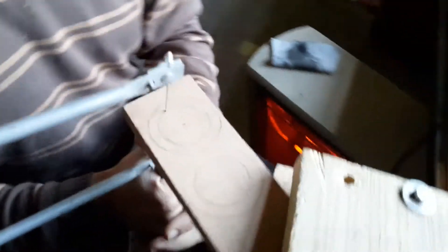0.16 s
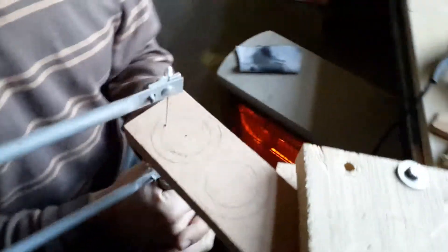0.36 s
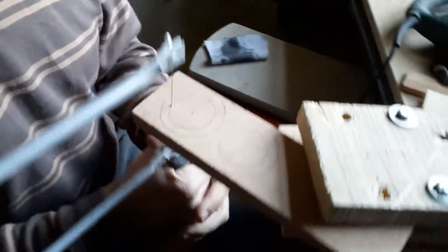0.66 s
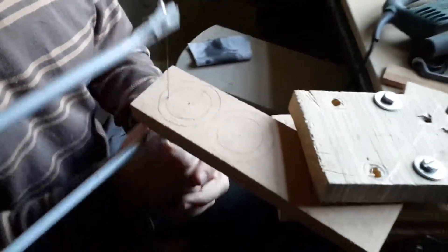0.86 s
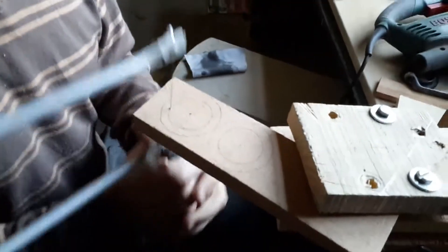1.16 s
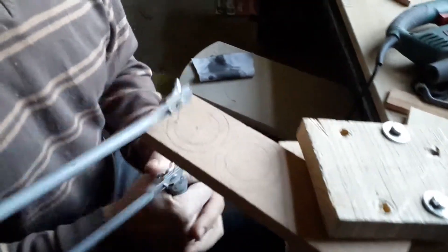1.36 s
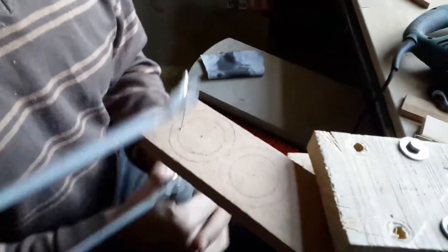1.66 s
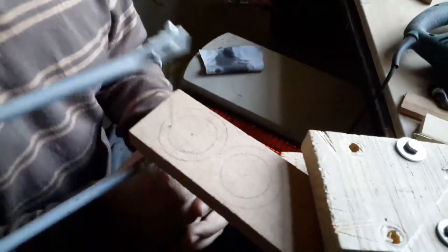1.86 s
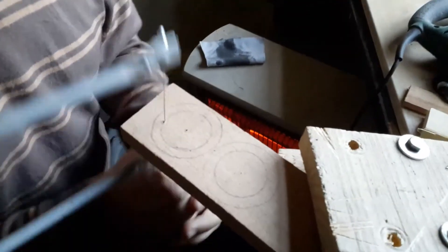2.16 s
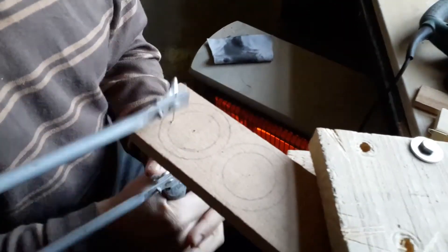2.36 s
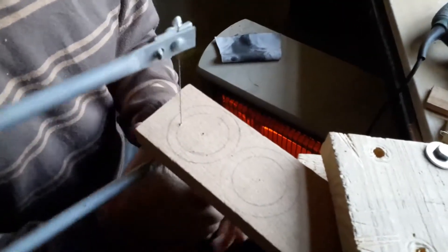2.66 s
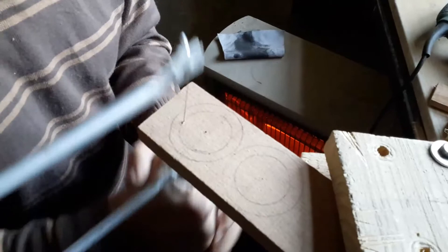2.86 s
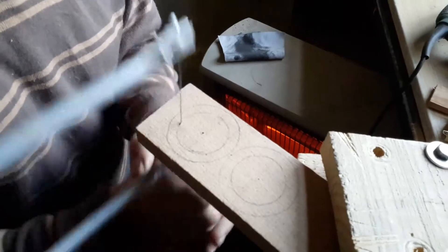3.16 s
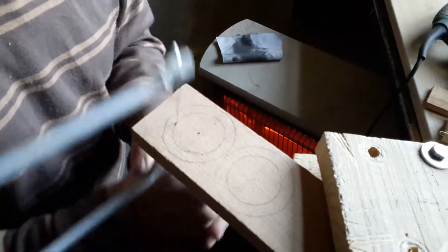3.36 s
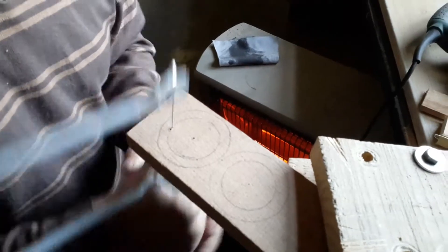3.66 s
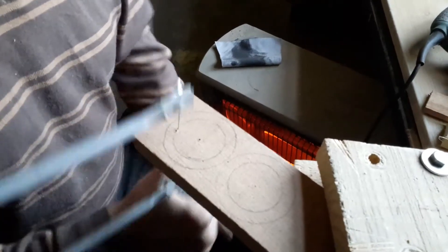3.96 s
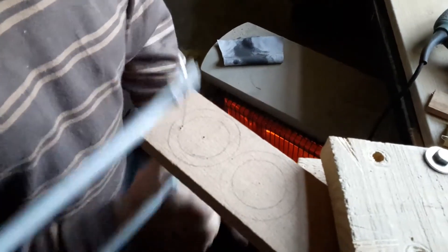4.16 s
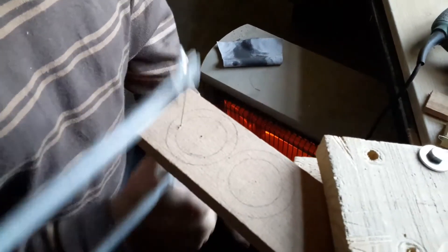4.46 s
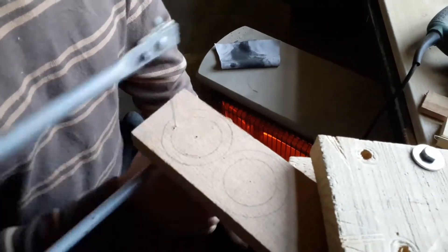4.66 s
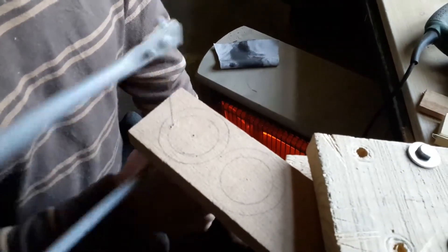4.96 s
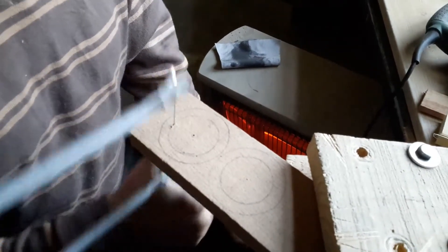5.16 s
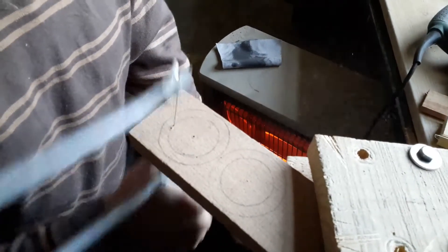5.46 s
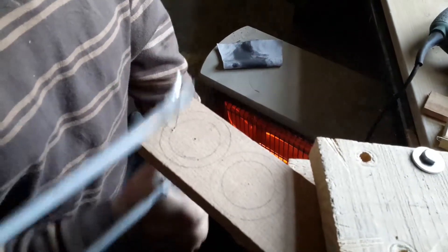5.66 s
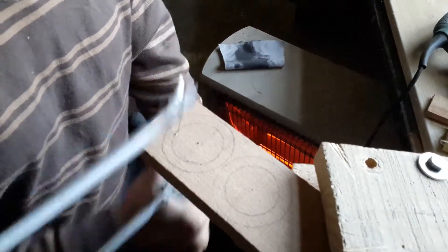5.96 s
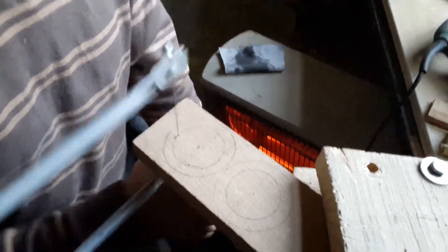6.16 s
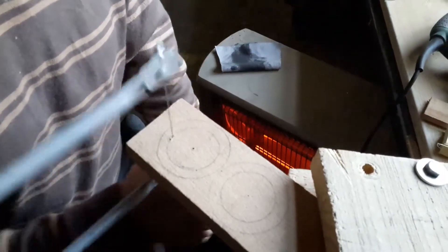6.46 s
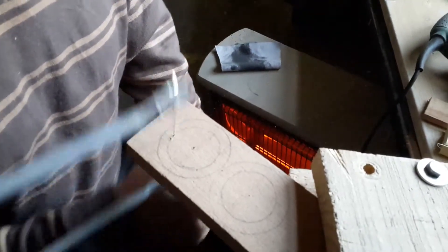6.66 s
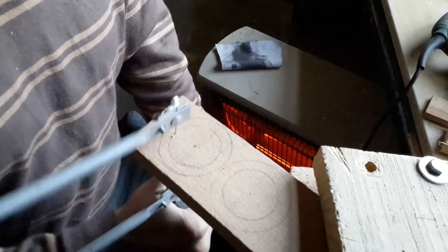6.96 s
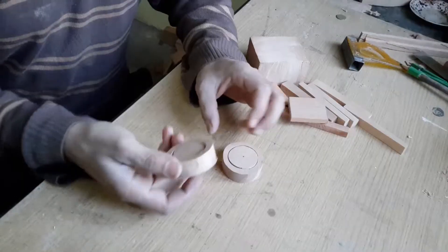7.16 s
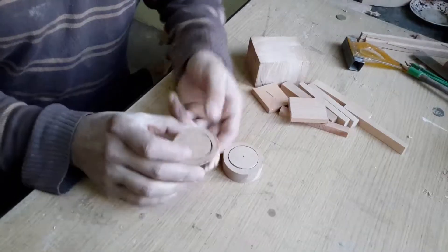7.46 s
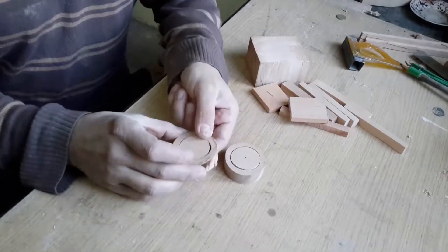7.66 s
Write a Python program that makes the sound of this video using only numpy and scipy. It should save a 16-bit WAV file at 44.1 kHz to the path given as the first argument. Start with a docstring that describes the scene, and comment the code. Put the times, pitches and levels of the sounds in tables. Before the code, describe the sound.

A wooden board thuds softly on a workbench, and two slow scrapes ease a hand fretsaw into it. Quick rasping strokes follow, about three back and forth each second, with brief squeaks from the thin blade. Several times the saw jams, knocking the board and rattling its steel frame. The sawing stops abruptly, leaving faint handling of wood. It is heard close up in a small, quiet workshop.

```python
"""Fingers tap wood, a board thuds on a workbench, and slow scrapes ease a hand fretsaw into it. Strokes follow,
about three each way a second: tooth clicks and tearing-fibre noise drive the filters of bench, board and blade.
Short tones sing, snagged teeth burst free, and now and then the jammed saw knocks the board: impulses excite
its decaying modes, and the steel frame rattles. The sound stops abruptly; then quiet handling of wood fades in."""
import sys
import numpy as np
from scipy import signal
from scipy.fft import irfft
from scipy.io import wavfile
from scipy.ndimage import uniform_filter1d

SR = 44100
rng = np.random.default_rng(int(sys.argv[2]) if len(sys.argv) > 2 else 0)


def put_to_file(sound):
    """Save the sound as 16-bit audio at rate SR, in the file named by the first command-line argument."""
    columns = np.atleast_2d(sound).T  # one column per channel
    safe = np.clip(columns, -1, 1)
    whole_steps = np.round(safe * 32767)
    wavfile.write(sys.argv[1], SR, whole_steps.astype(np.int16))


N = 343891

# Levels in the tables are relative: later gains shift them. Spectra have columns hz, level_db_per_hz;
# resonances have columns centre_hz, width_hz, lift_db.

# Down-and-up strokes of the saw: catch_s, length_s, tooth_rate_hz (at full hand speed),
# cut_pressure_db, return_pressure_db, fastest_return_moment (share of the length)
STROKES = [(0.932, 0.35, 574.4, 3, -5, 0.63), (1.245, 0.34, 600, 0.5, -7, 0.65),
           (1.598, 0.3, 604.8, -0.5, -9, .66), (1.916, 0.35, 637, 0.5, -5, .6),
           (2.261, 0.33, 578.8, 0.5, -5, 0.64), (2.583, 0.37, 627.4, 2, -4.5, 0.62),
           (3.155, .35, 489.6, -0.5, -6.5, .63), (3.49, 0.32, 609.6, 2, -4.5, 0.66),
           (3.819, 0.29, 620, 2, -19.5, .62), (4.143, 0.3, 554.2, 1, -2.5, .62),
           (4.444, 0.3, 582, 0.5, -6, 0.66), (4.754, 0.25, 608.6, -0.5, -3.5, 0.63),
           (5.047, 0.275, 678.5, 1.5, -6, .58), (5.342, 0.27, 572.8, 0, -2.5, .66),
           (5.633, 0.26, 570.3, 0.5, -7, 0.68), (5.924, 0.3, 668.5, 1.5, -3.5, .62),
           (6.216, 0.31, 620, 1, -5, 0.67), (6.513, 0.3, 630.5, 0.5, -3.5, 0.61),
           (6.821, 0.29, 643, 0.5, -2.5, 0.61)]
# Swing of the cut: start, fastest moment, end (shares of the stroke length, from the catch)
CUT_SWING = (-.09, .18, .43)
# Swing of the return: start, end (same shares)
RETURN_SWING = (.41, .87)
# The hand gathers pace: time_s, top_speed (share of full speed)
WARM_UP = [(.5, 0.4), (.85, 0.4), (1.0, .65), (1.7, 0.98)]
# Slow, even scrapes that ease the blade into the cut: start_s, end_s, pressure_db
SCRAPES = [(0.49, .58, -8), (.742, .945, -3.5)]
SCRAPE_ATTACK_S, SCRAPE_RELEASE_S = .006, .055
SCRAPE_HZ = 620  # tooth rate of the scrapes, were the hand at full speed
SLACK_DB = -5  # before the teeth catch, the blade only bows
COAST_S = 0.037  # the bench settles slowly when the blade stops

# Bench rumble while the saw runs: time_s, level_db
BENCH_RUMBLE = [(.5, -35), (1.0, -32.5), (1.75, -37.5), (2.05, -32.5), (2.4, -34.5), (2.7, -31.5),
                (3.9, -36), (4.25, -32.5), (4.7, -36.5), (5.4, -35), (5.68, -28.5), (5.9, -36.5),
                (6.5, -27), (6.72, -33), (7.05, -36)]
# Broad colour of each part under the teeth: hz, level_db_per_hz
BENCH_SPECTRUM = [(25, -44), (45, -25), (66, -6), (112, -16), (150, -9), (250, -6), (380, -9.5), (520, -8),
                  (900, -35.5), (3000, -95)]
BOARD_SPECTRUM = [(100, -31), (300, -7), (450, 1), (600, -0.5), (700, -2.5), (1000, -7), (1250, -1),
                  (1550, 0), (1900, -7.5), (2500, -14.5), (3300, -15.5), (5000, -43.5), (9000, -84)]
BLADE_SPECTRUM = [(400, -51.5), (1300, -24), (1600, -18.5), (1670, -4), (1850, -2), (1990, 3), (2110, -17),
                  (2380, -8.5), (2800, -27), (6000, -82.5)]
RASP_SPECTRUM = [(1200, -36), (2400, -2), (2900, -1.5), (3500, -4), (4300, -5.5), (4600, -21), (5700, -37),
                 (6400, -16.5), (7100, -45.5), (7600, -27), (8000, -46.5), (8700, -45), (9300, -79)]
# Resonances of the same parts: centre_hz, width_hz, lift_db
BENCH_RESONANCES = [(84.8, 10, 14.5), (141, 23, 10), (206, 15, 8), (228.2, 3.9, 8.5), (293.1, 9.7, 10),
                    (350.4, 21, 11), (371, 4.6, 1)]
BOARD_RESONANCES = [(467.8, 14, 16.2), (585.6, 7.1, 8), (760, 14, 10), (900, 14, 12), (1154, 84, 9.9),
                    (1270, 17, 0.91)]
BLADE_RESONANCES = [(1844, 14, 8), (1970, 22, 7.9), (1910, 36, 1.3)]
RASP_RESONANCES = [(3963, 92, 13.3), (5235, 170, 9.6), (6175, 63, 19.2), (7380, 220, 15.5)]

# A tooth snags and breaks free: start_s, level_db
SNAGS = [(1.605, -33), (1.831, -33), (3.146, -33.5), (3.557, -32), (4.451, -38), (5.208, -32.5),
         (5.354, -28.5), (6.227, -38), (6.832, -35)]
# Teeth in step with the board (low) or blade (high), which sings:
# middle_s, length_s, pitch_hz, slide_octaves_per_s, level_db
CHATTER = [(0.515, 0.065, 1970, -3, -51.5), (0.79, .09, 1920, -1.5, -41), (1.027, .12, 340.7, -0.4, -29.5),
           (1.32, 0.06, 469.2, -0.5, -27), (2.011, 0.083, 538.3, -10, -23.5),
           (2.064, .07, 305.5, -10.5, -26.5), (2.34, 0.056, 1846, 1, -26.5),
           (2.656, 0.063, 1862, -0.5, -22.5), (2.679, .06, 584.5, -5, -25), (3.226, .11, 1925, -0.5, -25),
           (3.374, .07, 581.5, 2, -31), (3.379, .05, 1169, -2, -34), (3.563, 0.027, 1811, -3, -23),
           (3.571, .08, 603, -1.5, -33), (3.725, .09, 504, -3, -29.5), (3.857, 0.043, 1850, 0, -26.5),
           (4.351, .09, 565.6, 0.2, -30), (4.501, .09, 292.3, 0, -24.5), (4.646, 0.075, 1942, 1.5, -30),
           (4.806, .05, 612.2, 2, -32), (4.81, 0.074, 1204, 1, -28), (4.822, 0.057, 1840, -2, -31),
           (4.935, 0.047, 2049, 1.5, -31), (5.108, 0.052, 1440, -3, -27), (5.396, .06, 590.1, 3, -31),
           (5.411, 0.078, 1103, 1.5, -33.5), (5.538, .05, 1975, 0.5, -32.5),
           (5.716, .05, 471.9, -3.5, -26.5), (5.826, .04, 1950, -0.5, -23.5), (5.986, .08, 1976, 0, -29.5),
           (6.721, .07, 1924, -0.5, -30), (6.885, .06, 1875, 2.5, -32), (6.895, .06, 591, -3, -21.5)]
CHATTER_TOP_HZ = 2520
# Splinters torn from the surface: hz, level_db_per_hz
SPLINTER_SPECTRUM = [(1200, -10), (2900, 5.5), (3700, -6), (5400, -8.5), (7000, -27), (9000, -28),
                     (13000, -42)]
SPLINTER_START_S, SPLINTER_END_S, SPLINTER_DB = 0.915, 1.12, -52.5  # the first hard stroke

# The jammed blade lifts the board and lets it slap back:
# start_s, level_db, frame_snap_db, favoured_mode_hz, mode_lift_db
KNOCKS = [(2.532, -15.5, -28, 445, 5.5), (3.4166, -11.5, -23, 1811, 0), (4.0473, -3, 0.5, 820.6, 5),
          (4.977, -17, -28, 560, 6), (5.575, -13, -29, 583.2, 5), (5.8613, -11, -20, 1157, -0.5)]
SOFT_KNOCK_HZ, HARDER_HZ = 1710, 5000  # top of a blow's spectrum: the faintest, and what full energy adds
REBOUND_HZ = 1486  # highest top of the spectrum of the rebounds
CONTACT_DB, CONTACT_S, CONTACT_GROWTH = -28, 0.00074, 1.7  # first contact grows faster than the slap
# The board shifts against the bench with a dull thud: start_s, level_db
THUDS = [(0.1588, -19.5), (.166, -11.5), (.194, -18.5), (.213, -32), (.576, -26.5), (1.211, -19),
         (2.2, -22), (4.46, -19.5), (6.53, -20)]
THUD_HZ = 560  # top of a thud's spectrum
SCUFF_DB, SCUFF_S = -18, 0.015  # a thud's faint scuff and its decay
PUSH_HZ, PUSH_S, PUSH_DB = 198.7, 0.0083, 2  # the low push of a thud
# Modes of the struck board: mode_hz, level_db
BOARD_MODES = [(136, -6.5), (182, -5), (233, -7.5), (345, -7), (390, -6.5), (440, -7.5), (532, -7.5),
               (586, -1), (702, -8.5), (822, -4.5), (1104, -3), (1157, -5.5), (1250, -8), (1495, -13.5),
               (1665, -6.5), (1809, -1), (1976, -7), (2153, -13), (2403, -14), (2638, -14.5), (3020, -16.5)]
FAVOUR_OCTAVES = 0.16  # reach of the lift around the favoured mode
# Crack of a blow: hz, level_db_per_hz
CRACK_SPECTRUM = [(60, -14.5), (150, -4), (500, 7.5), (800, 3), (1200, -3.5), (1450, -4), (1850, 8),
                  (2150, -1), (2500, 3), (3100, -10), (3600, -18.5), (4400, -13), (5400, -38), (9000, -54),
                  (14000, -61.5)]
# Snap of a blow: hz, level_db_per_hz
SNAP_SPECTRUM = [(1100 / 3, -24), (1100, 0), (2200, -1), (3100, -8),
                 (4300, -6), (5400, -32), (9000, -50), (14000, -54)]
# Returns of a blow from the board's edges and clamps: delay_s, amplitude_share
EDGE_ECHOES = [(0, 1), (.0011, -0.23), (.0022, 0.96), (.0056, 0.38), (.0078, -0.041), (0.0091, 0.2)]
# Boom of bench and room after a knock: delay_s (to the middle), length_s, pitch_hz, level_db
BOOM_SWELLS = [(0.038, 0.0441, 205, -14.5), (.068, 0.0468, 180, -15)]
KNOCK_ROOM_DB = 11.5
# Steel frame and clamps: hz, level_db_per_hz
FRAME_SPECTRUM = [(1000, -32.5), (2500, -10), (3400, -3.5), (4300, -1.5), (4800, -9), (5400, -28.5),
                  (9000, -48)]
# Their resonances: centre_hz, width_hz, lift_db
FRAME_RESONANCES = [(3350, 59, 12.5), (3580, 46, 8.5), (3980, 50, 9.5), (4270, 35, 5.5)]

# Quiet background of the workshop: hz, level_db_per_hz
AIR_SPECTRUM = [(25, -33.5), (45, -17.5), (80, 1), (250, 0), (550, -7.5), (1300, -13), (2300, -17.5),
                (3500, -31), (5300, -29.5), (7000, -41), (9000, -49.5), (14000, -56)]
# Its course: time_s, level_db
AIR_LEVEL = [(0, -43), (.12, -50), (.4, -51.5), (0.699, -49.5), (3.051, -53.5), (7.1, -49), (7.48, -90),
             (7.551, -62), (7.619, -63), (7.699, -56), (7.8, -52.5)]
# Light clicks of wood and metal under the fingers: start_s, level_db
TOUCHES = [(.088, -37), (0.125, -39.5), (.281, -42), (0.543, -31), (0.576, -27.5), (7.549, -60),
           (7.588, -64.5), (7.629, -58), (7.665, -59), (7.744, -51), (7.788, -56)]
# Colour of the clicks and of the rustle: hz, level_db_per_hz
TOUCH_SPECTRUM = [(100, 5), (400, 7.5), (1200, 4.5), (2000, -9.5), (3300, -12), (5000, -32), (7000, -45.5),
                  (12000, -57.5)]
# Reverberation of the room: hz, t60_s
ROOM_T60 = [(100, 0.7), (400, 0.43), (1000, 0.3), (2700, 0.2), (8000, 0.17)]
SILENT_FROM_S, SILENT_TO_S = 7.07, 7.48
LOW_CUT_HZ, EDGE_HZ = 72, 14470  # the microphone's bass roll-off, and the upper band limit


def saw(grip_db=1.8, clamp_s=0.00034, travel_s=0.0013, clamp_share=0.1, lean_db=1.15):
    """Forced vibration: bites and tearing drive each part; brighter parts depend more steeply on blade speed."""
    speed, height, hold, tooth_hz, pressure_db = arm_motion()
    bites, tearing = teeth(tooth_hz), fibres()
    grip = hold * amp(grip_db * wander(70))  # hard and soft spots in the wood
    t = np.arange(N) / SR
    moving = 1. * (speed > 0)
    last_moving_s = np.maximum.accumulate(t * moving)
    settling = np.exp(-(t - last_moving_s) / COAST_S) * (t > SCRAPES[0][0])

    def part(response, level_db, press, steepness, buzz, drag_db, dragging=moving):
        """Source and filter: buzz is the bites' share of the power, press the response to pressure in dB per dB."""
        drive = np.sqrt(buzz) * bites + np.sqrt(1 - buzz) * tearing
        # each bite returns from the blade clamp, whose distance changes: the colour sweeps
        reflection = np.interp(t - clamp_s - travel_s * height, t, drive)
        drive = unit(drive + clamp_share * reflection)
        force = speed ** steepness + amp(drag_db) * dragging  # even a slow blade drags
        lean = lean_db * wander(25)  # the blade leans in the cut and favours now one part, now another
        gain = amp(level_db + lean + press * pressure_db)
        return through(drive * grip * gain * force, response)

    bench_db = np.interp(t, *np.transpose(BENCH_RUMBLE)) - 3.0
    bench = part(body(BENCH_SPECTRUM, BENCH_RESONANCES), bench_db, press=0.19, steepness=0.31,
                 buzz=0.3, drag_db=-5.0, dragging=settling)
    board = part(body(BOARD_SPECTRUM, BOARD_RESONANCES), level_db=-35.0, press=1.0, steepness=0.54,
                 buzz=0.41, drag_db=-14.0)
    blade = part(body(BLADE_SPECTRUM, BLADE_RESONANCES), level_db=-31.0, press=1.42, steepness=2.26,
                 buzz=0.55, drag_db=-19.5)
    # the hand flexes the frame, so the tension and pitch of the blade waver by about one percent
    blade = soften(np.interp(t + .00015 * wander(40), t, blade), 5000)
    rasp = part(body(RASP_SPECTRUM, RASP_RESONANCES), level_db=-42.5, press=1.0, steepness=2.43,
                buzz=0.24, drag_db=-25.5)
    near = bench + board + blade + rasp
    return amp(-3.5) * near + amp(-7.0) * through(near, room_tail())


def arm_motion():
    """Reciprocating motion: speed 0-1, height 0-1, hold on the wood 0-1, tooth rate in Hz, pressure in dB."""
    t = np.arange(N) / SR
    speed, height, hold = np.zeros(N), np.zeros(N), np.ones(N)
    full_speed_hz, pressure_db = np.full(N, 1. * SCRAPE_HZ), np.zeros(N)
    for catch, length, hz, cut_db, return_db, fastest in STROKES:
        return_start, return_end = RETURN_SWING
        return_swing = return_start, np.clip(fastest, return_start, return_end), return_end
        for shares, down, db in (CUT_SWING, 1, cut_db), (return_swing, -1, return_db):
            marks = catch + length * np.array(shares)
            now = slice(int(marks[0] * SR), int(marks[-1] * SR))
            swing = np.interp(t[now], marks, [0, np.pi / 2, np.pi])
            speed[now] = np.maximum(speed[now], np.sin(swing))
            height[now] = (1 + down * np.cos(swing)) / 2
            full_speed_hz[now] = hz
            pressure_db[now.start:] = db
        cut_start = catch + length * CUT_SWING[0]
        hold[int(cut_start * SR):int(catch * SR)] = amp(SLACK_DB)
    for start, end, db in SCRAPES:
        rise, fall = (t - start) / SCRAPE_ATTACK_S, (end - t) / SCRAPE_RELEASE_S
        scrape = np.clip(np.minimum(rise, fall), 0, 1)
        pressure_db[scrape > speed] = db
        speed = np.maximum(speed, scrape)
    speed = np.maximum(speed * np.interp(t, *np.transpose(WARM_UP)), 0)
    return speed, height, hold, full_speed_hz * speed, pressure_db


def teeth(rate_hz, jitter=.05, uneven_db=3.0):
    """Impulse train: one click for each tooth that enters the wood, of uneven strength and spacing."""
    passed = np.floor(np.cumsum(rate_hz * (1 + jitter * wander(300))) / SR)
    strength = amp(uneven_db * np.clip(rng.standard_normal(N), -2, 2))
    clicks = (np.diff(passed, prepend=0) > 0) * strength
    return unit(clicks - uniform_filter1d(clicks, size=400))  # less its slow mean


def fibres(per_s=4000, spread_db=4.5, clump_db=3.5):
    """Random impulse noise: wood fibres tear in small clumps of snaps."""
    snaps = (rng.random(N) < per_s / SR) * rng.choice([-1, 1], N)
    snaps = snaps * amp(spread_db * rng.standard_normal(N))
    return unit(snaps * amp(clump_db * wander(130)))


def snags(decay_s=0.013, board_db=-3):
    """Sudden release: a snagged tooth lets go in a decaying burst of noise through board and blade."""
    force = np.zeros(N)
    for s, db in SNAGS:
        add(force, s, amp(db) * np.exp(-np.arange(SR // 10) / SR / decay_s))
    board = amp(board_db) * body(BOARD_SPECTRUM, BOARD_RESONANCES)
    blade = body(BLADE_SPECTRUM, BLADE_RESONANCES)
    return through(force * rng.standard_normal(N), board + blade)


def chatter(waver=.022, shake_db=1.5, octave_db=-14, third_db=-18, room_db=-9):
    """Self-sustained oscillation: teeth in step with board or blade give short, rough, sliding harmonic tones."""
    out, drift, shake = np.zeros(N), wander(250), wander(200)
    for middle, length, hz, slide, db in CHATTER:
        t = np.arange(-length / 2, length / 2, 1 / SR)
        now = ((middle + t) * SR).astype(int)
        pitch_hz = hz * 2 ** (slide * t) * (1 + waver * drift[now])
        phase = 2 * np.pi * np.cumsum(pitch_hz) / SR
        tone = np.sin(phase) + amp(octave_db) * np.sin(2 * phase) + amp(third_db) * np.sin(3 * phase)
        swell = np.sin(np.pi * np.linspace(0, 1, len(t)) ** 0.98)  # rises slightly faster than it dies
        add(out, middle + t[0], amp(db + shake_db * shake[now]) * tone * swell)
    out = soften(out, CHATTER_TOP_HZ)
    return amp(-1.0) * out + amp(room_db) * through(out, room_tail())


def splinters():
    """Brittle fracture: a brief spray of fine, bright ticks swells and fades."""
    swell = np.sin(np.interp(np.arange(N) / SR, (SPLINTER_START_S, SPLINTER_END_S), [0, np.pi]))
    ticks = swell * fibres(per_s=1000, spread_db=2.5)
    return amp(SPLINTER_DB) * through(ticks, body(SPLINTER_SPECTRUM))


def shudder(lead_s=0.039, length_s=0.091, first_db=-52, growth_db_per_s=2.0, top_hz=72):
    """Low-frequency forcing: the bench shudders as the teeth catch on each cut, more as the work goes on."""
    swell = np.zeros(N)
    for catch, *_ in STROKES:
        add(swell, catch - lead_s, amp(first_db + growth_db_per_s * catch) * np.hanning(int(length_s * SR)))
    return swell * unit(soften(rng.standard_normal(N), top_hz))


def knocks(rattle_db=-17, rattle_s=0.037, rattle_per_s=350, spread_s=.0009, ring_db=-11.5, crack_db=14,
           snap_db=-4.5, snap_s=0.0028, boom_db=2):
    """Impact excitation: slaps and thuds make the board snap, ring and rattle; a stronger slap is brighter."""
    t = np.arange(SR // 2) / SR

    def burst(decay_s, top_hz):
        """Decaying noise, a contact of many small impacts."""
        return soften(rng.standard_normal(len(t)) * np.exp(-t / decay_s), top_hz)

    # a lift of 0 dB favours no mode
    hits = [(s, db, THUD_HZ, 410, 0) for s, db in THUDS]
    for s, db, _, favoured_hz, lift_db in KNOCKS:
        hits.append((s, db, SOFT_KNOCK_HZ + HARDER_HZ * amp(db) ** 2, favoured_hz, lift_db))

    blows, rings, snaps, low, contact = np.zeros((5, N))
    for s, db, hard_hz, favoured_hz, lift_db in hits:
        rebounds = (rng.random(len(t)) < rattle_per_s / SR) * rng.choice([-1, 1], len(t))
        rebounds = soften(rebounds * np.exp(-t / rattle_s), min(hard_hz, REBOUND_HZ))
        blow = amp(db) * (soften(1. * (t == 0), hard_hz) + amp(rattle_db) * rebounds)
        add(blows, s, blow)
        add(rings, s, through(blow, board_ring(t, favoured_hz, lift_db)))
        add(snaps, s, amp(db) * burst(snap_s, hard_hz))
    for s, db, *_ in KNOCKS:
        add(low, s, amp(db + boom_db) * boom())
        add(contact, s, amp(CONTACT_GROWTH * db + CONTACT_DB) * burst(CONTACT_S, 7500))
    push = t / PUSH_S * np.exp(-t / PUSH_S) * np.sin(2 * np.pi * PUSH_HZ * t)
    for s, db in THUDS:
        add(snaps, s, amp(db + SCUFF_DB) * burst(SCUFF_S, SOFT_KNOCK_HZ))
        add(low, s, amp(db + PUSH_DB) * push)

    snap = through(snaps, body(SNAP_SPECTRUM))
    slap = through(bend(blows, spread_s), body(CRACK_SPECTRUM))
    crack = np.zeros(N)
    for delay_s, share in EDGE_ECHOES:
        add(crack, delay_s, share * slap)
    room = amp(KNOCK_ROOM_DB) * through(slap, room_tail(first_s=0.0063))
    room = room + amp(snap_db - 7.0) * through(snap, room_tail())
    ring = amp(ring_db) * bend(rings, spread_s)
    return amp(snap_db) * snap + ring + amp(crack_db) * crack + room + low + contact


def board_ring(t, favoured_hz, lift_db):
    """Modal superposition: high modes die sooner; the place of the blow lifts those near one pitch."""
    ring = 0
    for k, (hz, db) in enumerate(BOARD_MODES):
        t60 = .33 * (200 / hz) ** .35
        octaves_away = np.log2(hz / favoured_hz)
        db = db + lift_db * np.exp(-(octaves_away / FAVOUR_OCTAVES) ** 2)
        ring = ring + (-1) ** k * amp(db - 60 * t / t60) * np.sin(2 * np.pi * hz * t)
    return soften(ring, 4800)


def bend(x, delay_s, size=4096):
    """Dispersion: bending waves reach a plate's edge high notes first; delay_s is the delay at 1 kHz."""
    hz = np.fft.rfftfreq(size, 1 / SR)
    phase = 4 * np.pi * delay_s * np.sqrt(1000 * hz)
    return through(x, irfft(np.exp(-1j * phase))[:size // 2])


def boom():
    """Delayed low resonance: bench and room answer a blow in two successive swells."""
    out = np.zeros(SR // 4)
    for delay_s, length, hz, db in BOOM_SWELLS:
        t = np.arange(0, length, 1 / SR)
        add(out, delay_s - length / 2, amp(db) * np.hanning(len(t)) * np.sin(2 * np.pi * hz * t))
    return out


def frame_rattle(bounce_db=-9, bounce_s=0.0092, fade_s=.04, bite_s=.0012, room_db=-5, count=9):
    """Repeated impact: at each knock the steel frame snaps, then bounces unevenly in its clamps."""
    t = np.arange(SR // 100) / SR
    taps = np.zeros(N)
    for s, _, snap_db, *_ in KNOCKS:
        delays = np.cumsum(bounce_s * (.5 + rng.random(count)))
        bounces = [(delay, amp(bounce_db) * np.exp(-delay / fade_s)) for delay in delays]
        for delay, size in [(0.0022, 0.91)] + bounces:
            tap = rng.standard_normal(len(t)) * np.exp(-t / bite_s)
            add(taps, s + delay, amp(snap_db) * size * tap / np.linalg.norm(tap))
    out = through(taps, body(FRAME_SPECTRUM, FRAME_RESONANCES))
    return out + amp(room_db) * through(out, room_tail())


def workshop(flutter_db=0.15, touch_s=0.0033, rustle_db=-9):
    """Filtered noise: soft room noise, the crackly rustle of sleeves, and light taps of fingers on wood."""
    level_db = np.interp(np.arange(N) / SR, *np.transpose(AIR_LEVEL)) + flutter_db * wander(40)
    air = through(rng.standard_normal(N), body(AIR_SPECTRUM))
    rustle = through(fibres(per_s=1200, spread_db=5.0, clump_db=3.5), body(TOUCH_SPECTRUM))
    out = amp(level_db) * (amp(-1) * air + amp(rustle_db) * rustle)
    t = np.arange(SR // 20) / SR
    for s, db in TOUCHES:
        tap = rng.standard_normal(len(t)) * np.exp(-t / touch_s)
        add(out, s, amp(db) * through(tap, body(TOUCH_SPECTRUM)))
    return out


def room_tail(first_s=0.0028):
    """Reverberation: dense reflections of energy 1, each band dying at its own speed."""
    taps = rng.standard_normal(SR // 2) * (np.arange(SR // 2) > first_s * SR)
    hz, t, z = signal.stft(taps, SR, nperseg=256)
    decay = amp(-60 * t / read(ROOM_T60, hz)[:, None])
    tail = signal.istft(z * decay, SR, nperseg=256)[1]
    return tail / np.linalg.norm(tail)


def body(spectrum, peaks=(), size=8192):
    """Minimum-phase filter: a causal response of energy 1, a broad colour with resonances on top."""
    hz = abs(np.fft.fftfreq(size, 1 / SR))
    lift = 1 + sum((amp(db) ** 2 - 1) / (1 + (2 * (hz - f) / width) ** 2) for f, width, db in peaks)
    log_gain = np.log(amp(read(spectrum, hz)) * np.sqrt(np.maximum(lift, .1)))
    # the Hilbert transform of the log gain gives the phase
    response = np.fft.ifft(np.exp(np.conj(signal.hilbert(log_gain)))).real[:size // 2]
    return response / np.linalg.norm(response)


def through(x, response):
    """Convolution: passes a source through the impulse response of a body."""
    return signal.oaconvolve(x, response)[:len(x)]


def soften(x, top_hz):
    """Low-pass filtering: takes away the treble above top_hz, as a longer contact does."""
    return signal.sosfilt(signal.butter(4, min(top_hz, SR / 3), fs=SR, output="sos"), x + 1e-18)


def wander(hz):
    """Random modulation: smooth chance of rms 1 with hz random knots a second."""
    knots = np.arange(N) * hz / SR
    return unit(np.interp(knots, np.arange(N), rng.standard_normal(N)))


def amp(db):
    """Decibel law: level in dB to amplitude."""
    return 10 ** (np.asarray(db) / 20)


def unit(x):
    """Normalization: scales to rms 1."""
    return x / np.sqrt(np.mean(x ** 2) + 1e-20)


def read(points, hz):
    """Interpolation: joins the points by straight lines on a log-frequency axis."""
    f, value = np.transpose(points)
    return np.interp(np.log(hz + 1), np.log(f + 1), value)


def add(mix, s, sound):
    """Superposition: adds a sound to the mix in place, from s seconds on."""
    part = mix[max(round(s * SR), 0):][:len(sound)]
    part += sound[:len(part)]


def scene():
    """Superposition of all sources, as one channel."""
    sawing = saw() + snags() + chatter() + splinters() + shudder()
    return (sawing + knocks() + frame_rattle() + workshop())[None]


def record(dry):
    """Band limiting: the microphone thins the bass, the sound breaks off for a moment, the top is cut."""
    t = np.arange(N) / SR
    running = uniform_filter1d(1. * ((t < SILENT_FROM_S) | (t > SILENT_TO_S)), size=40)
    heard = signal.sosfilt(signal.butter(2, LOW_CUT_HZ, "high", fs=SR, output="sos"), dry)
    band_limit = signal.firwin(511, EDGE_HZ, window=("kaiser", 9), fs=SR)
    return signal.oaconvolve(heard * running, band_limit[None], "same")


dry = scene()
out = record(dry)
put_to_file(out)
```